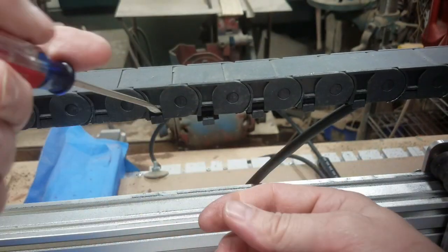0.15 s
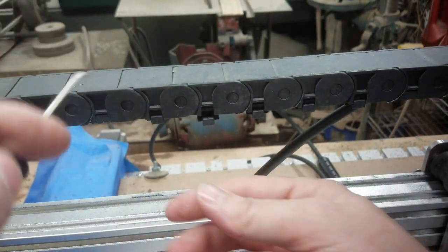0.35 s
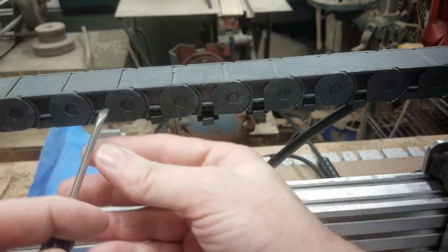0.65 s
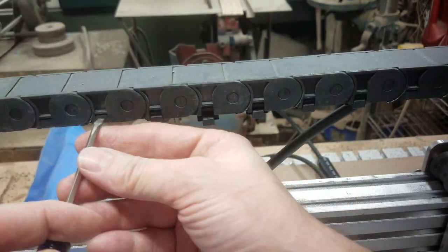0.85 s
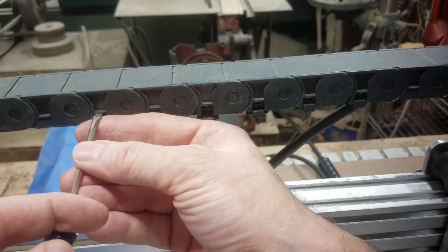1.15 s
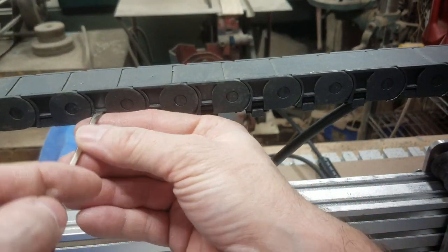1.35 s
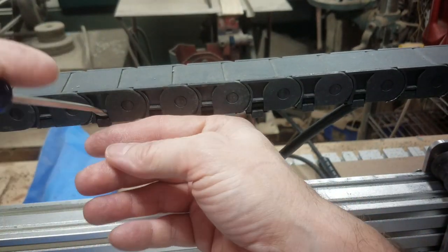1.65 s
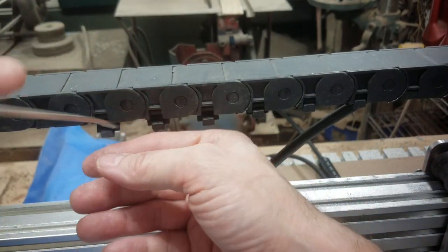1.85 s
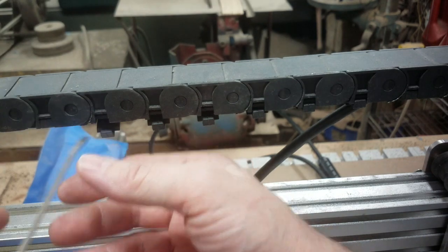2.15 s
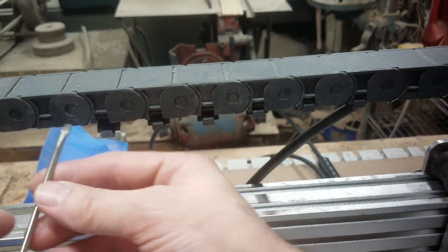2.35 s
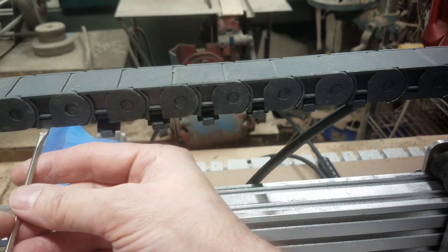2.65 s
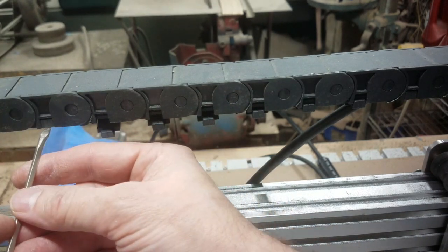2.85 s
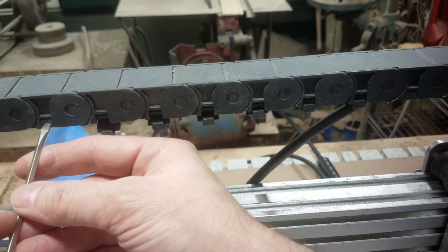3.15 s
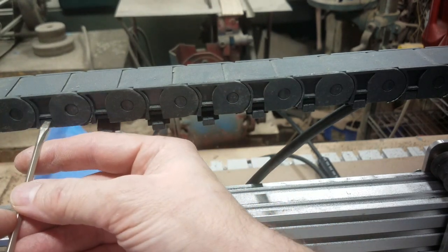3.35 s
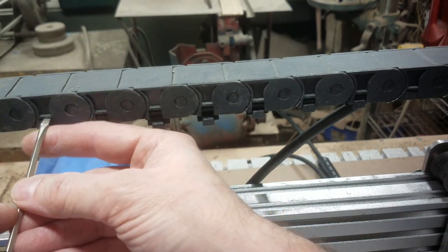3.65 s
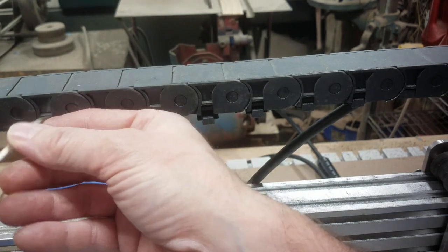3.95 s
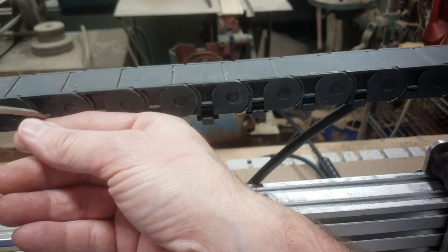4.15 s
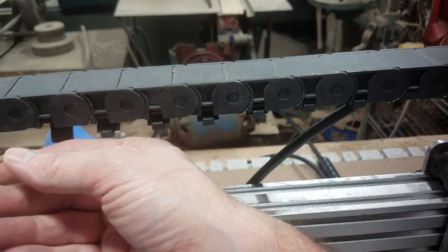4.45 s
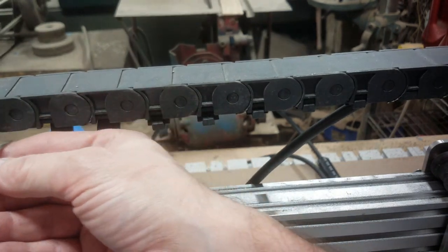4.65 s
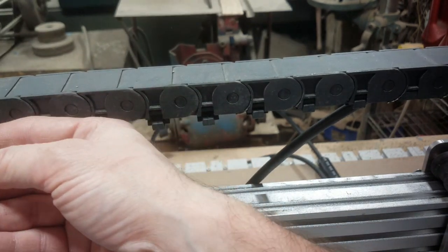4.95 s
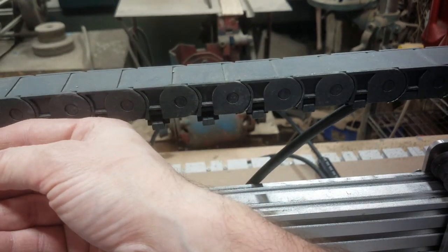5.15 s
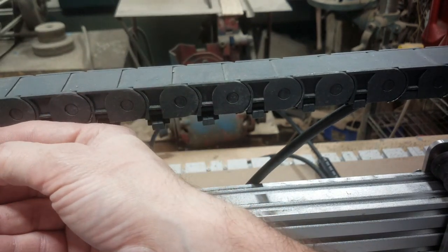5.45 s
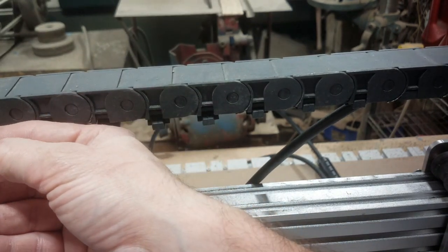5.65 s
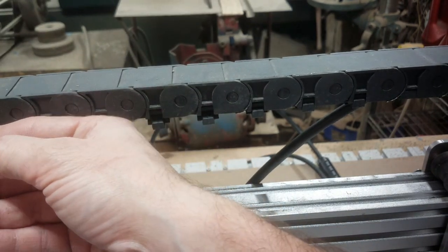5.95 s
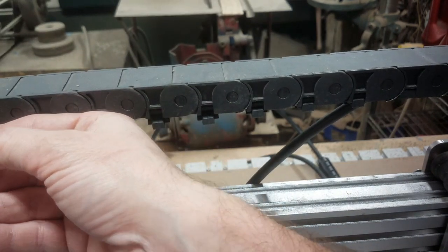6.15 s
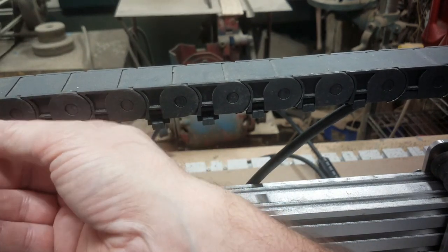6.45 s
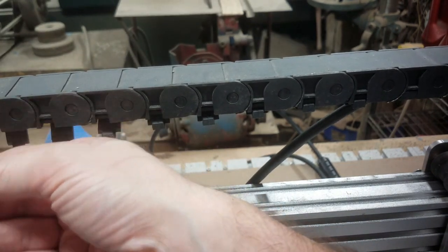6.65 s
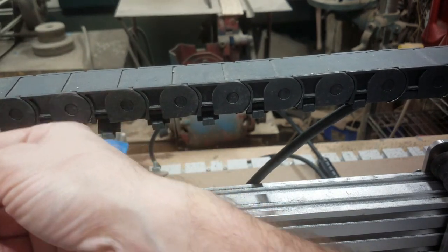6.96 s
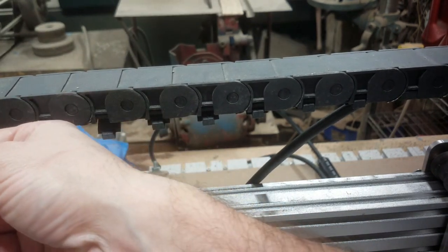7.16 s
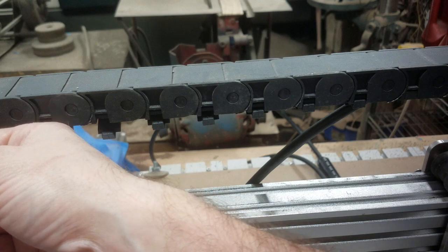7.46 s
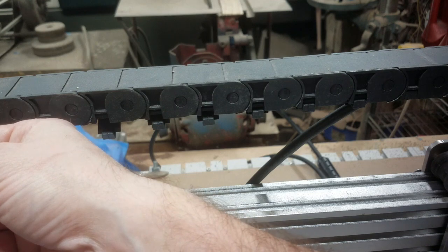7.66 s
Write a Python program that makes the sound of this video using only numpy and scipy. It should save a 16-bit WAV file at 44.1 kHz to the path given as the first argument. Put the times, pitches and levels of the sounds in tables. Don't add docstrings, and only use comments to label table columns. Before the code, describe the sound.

Sharp plastic snaps as a small blade pries chain crossbars open, with light taps, gritty slips and one brief squeak over faint workshop hum.

```python
import sys
import numpy as np
from scipy import signal
from scipy.fft import rfft, irfft
from scipy.io import wavfile
from scipy.ndimage import uniform_filter1d

SR = 44100
rng = np.random.default_rng(int(sys.argv[2]) if len(sys.argv) > 2 else 0)


def natural_amplitude(level_db):
    exponent = np.asarray(level_db, float) / 20
    return 10 ** exponent


def int16_out(signal):
    q = np.round(np.clip(np.atleast_2d(signal).T, -1, 1) * 32767)
    wavfile.write(sys.argv[1], SR, q.astype(np.int16))


N = 343530
PORT_LAG = 8


def evened(x):
    return x / np.sqrt(np.mean(x ** 2) + 1e-20)


def read(points, hz):
    f, value = np.transpose(points)
    return np.interp(np.log(hz + 1), np.log(f + 1), value)


def add(mix, s, sound):
    part = mix[..., round(s * SR):][..., :sound.shape[-1]]
    part += sound[..., :part.shape[-1]]


def shaped(x, db):
    return irfft(rfft(x) * natural_amplitude(db), x.shape[-1])


# [f/Hz, level/dB, t60/s]
LINK_MODES = [(586, -48, 0.065), (750, -1, 0.012), (910, 0, 0.013), (1368, -7, 0.026), (1830, 11, 0.0088),
              (2320, 3, 0.039), (2800, 10.5, 0.021), (3276, -3, 0.049), (4140, -5, 0.039), (4670, 2, 0.028),
              (5330, -15, 0.023)]
# [f/Hz, level/dB]
SPRAY_COLOUR = [(400, -24.), (700, -2.), (1000, 0.), (2500, 0.), (4600, -1.), (5800, -10.), (7000, -4.),
                (8500, -1.), (12000, -1.), (16500, -6.)]
# [low f/Hz, high f/Hz, t60/s]
SPRAY_RANGES = [(300, 1500, .055), (1500, 6300, .036), (6300, 17000, .018)]


def click(db, body_db, edge_db, ring_hz, length, tuning, chance):
    t, f = np.arange(3000) / SR, np.fft.rfftfreq(3000, 1 / SR)
    focus_db = np.clip(-db / 3.5, 3, 11)

    def bump(hz):
        return focus_db * np.exp(-(np.log(hz / ring_hz + 1e-9) / .17) ** 2)

    cracks = chance[:300] ** 3 * np.exp(-t[:300] / .001)
    cracks = cracks / np.linalg.norm(cracks)
    hz, mode_db, t60 = np.transpose(LINK_MODES)[..., None]
    count = len(LINK_MODES)
    hz = hz * (1 + .06 * tuning[:count, None])
    mode_db = mode_db + 3 * tuning[20:20 + count, None]
    decay_db = -60 * t / np.minimum(length * t60, .035)
    modes = natural_amplitude(mode_db + bump(hz) + decay_db) * np.sin(2 * np.pi * hz * t)
    white = chance[400:] * natural_amplitude(2.5 * evened(uniform_filter1d(chance[:3000], 12)))
    rise = np.minimum(t / .0003, 1) * (1 + .8 * np.exp(-t / .0012))
    sound = 0
    for (lo, hi, fall), level_db in zip(SPRAY_RANGES, (db + body_db, db, db + edge_db)):
        outside = (f < lo) | (f >= hi)
        spray = shaped(white, read(SPRAY_COLOUR, f) + bump(f) - 80 * outside)
        spray = spray * natural_amplitude(-60 * t / (length * fall)) * rise
        inside = (hz >= lo) & (hz < hi)
        ring = signal.fftconvolve((modes * inside).sum(0), cracks)[:3000]
        part = spray + natural_amplitude(-17) * ring
        loudest = np.sqrt(uniform_filter1d(part ** 2, 170).max())
        sound = sound + natural_amplitude(level_db - 2.5) * part / loudest
    return sound


# [t/s, peak level/dB, body level/dB, edge level/dB, ring length factor]
BAR_SNAPS = [
    (1.4625, -7, -9.5, -4.5, 0.57),
    (1.5803, -18.5, -7.5, -1.5, .45),
    (4.0031, -8, -11, -7, .9),
    (6.2173, -5.5, -16.5, -2.5, 0.91),
]
# [f/Hz, level/dB, t60/s]
BAR_MODES = [
    [(1410, -1, .04), (453, -3.5, .09), (2380, -4, .05), (4400, -7, .06), (8800, 5.5, 0.036)],
    [(2780, -1, .06), (950, 0, 0.044), (4580, -8, .05)],
    [(1770, -3, .05), (690, -1.5, .07), (2390, -1, 0.065), (4000, -4, .04), (8400, -2, 0.032)],
    [(1934, -5, .08), (740, -9, 0.065), (2380, -8, .05), (3280, -7, .06), (4400, -9, .06)],
]


def snaps():
    return [(*row[:4], modes[0][0], row[4]) for row, modes in zip(BAR_SNAPS, BAR_MODES)]


def loose_bar(db, modes, chance):
    t = np.arange(6000) / SR
    hz, mode_db, t60 = np.transpose(modes)[..., None]
    decay_db = -60 * t / np.clip(t60, .015, .06)
    ring = natural_amplitude(mode_db + decay_db) * np.sin(2 * np.pi * (hz * t + chance[:len(modes), None]))
    push_hz, push_s = 110, .016
    shove = sum(np.sin(2 * np.pi * (push_hz * (0.545 + u) * t + u)) for u in chance[:3])
    push = t / push_s * np.exp(1 - t / push_s) * shove
    return natural_amplitude(db - 14) * ring.sum(0) * np.minimum(t / 0.00057, 1) + natural_amplitude(db - 50) * push


# [t/s, peak level/dB, edge level/dB, ring f/Hz]
BLADE_TAPS = [(0.065, -36, -5, 3160), (0.1142, -31.5, -25, 2900), (0.1441, -29.5, 1, 2040),
              (0.474, -33.5, -15, 2450), (1.2443, -31.5, -26, 3260), (1.4413, -28, -6, 1460),
              (1.6747, -33, -28, 2650), (1.8061, -24, -27, 2410), (2.547, -42, -7, 1160),
              (3.855, -37, -22, 3200), (3.9819, -23.5, -8, 1780), (4.085, -32, -20, 1980),
              (4.1937, -37, -4, 2470), (4.211, -28, -19, 2140), (5.6341, -40.5, -2.5, 1210),
              (5.888, -33, -9, 1310), (6.2569, -25, -6, 1000), (6.3528, -34, 6.5, 3570),
              (7.0382, -45, -9, 2940)]


def taps():
    hits = []
    for s, db, edge_db, ring_hz in BLADE_TAPS:
        body_db = -6.5 - 11.5 * np.log2(ring_hz / 2000)
        hits.append((s, db, body_db, edge_db, ring_hz, 0.7))
    return hits


# [t/s, peak level/dB, ring f/Hz]
SHAFT_KNOCKS = [
    (1.3418, -51, 1250),
    (1.407, -49, 1070),
    (4.677, -50, 920),
    (5.6496, -49, 1000),
    (5.6776, -51, 1600),
    (3.86, -47.5, 795),
]


def knocks():
    body_db, edge_db, ring_length = 8.5, -6, 0.55
    return [(s, db, body_db, edge_db, hz, ring_length) for s, db, hz in SHAFT_KNOCKS]


# [t/s, peak level/dB, edge level/dB, ring f/Hz]
TIP_TICKS = [
    (3.0625, -48.5, 4, 4500),
    (3.185, -52.5, 0, 4500),
    (5.012, -44.5, -4, 4560),
    (5.549, -42, 6.5, 6000),
    (5.4835, -43, -25, 4400),
    (7.5107, -55, 2, 3000),
    (7.6303, -55, 2, 4000),
]


def ticks():
    body_db, ring_length = -14, .55
    return [(s, db, body_db, edge_db, hz, ring_length) for s, db, edge_db, hz in TIP_TICKS]


# [f/Hz, level/dB per Hz]
RUB_COLOUR = [(290, -35), (500, -17), (868, -5.5), (1050, -6.5), (1190, -9.5), (1600, -11.5), (1840, -15),
              (2730, -8), (2930, -12), (4870, -18), (6800, -32.5), (8960, -14), (16000, -29)]


def scrape(rows, chance):
    s, *columns = np.transpose(rows)
    t = np.arange(s[0], s[-1], 1 / SR)
    db, body_db, edge_db = (np.interp(t, s, c) for c in columns)
    slips = chance[0] * natural_amplitude(3.5 * evened(uniform_filter1d(chance[1], 40)))
    z = signal.stft(slips, nperseg=128)[2]
    patches = chance[2:].reshape(-1)[:z.size].reshape(z.shape)
    patches = evened(uniform_filter1d(uniform_filter1d(patches, 2, 0), 7, 1))
    grit = signal.istft(z * natural_amplitude(5.5 * patches), nperseg=128)[1]
    f = np.fft.rfftfreq(len(grit), 1 / SR)
    colour = np.maximum(read(RUB_COLOUR, f), -27)
    parts = []
    for lo, hi in ((550, 1500), (1500, 7000), (7000, 16500)):
        outside = (f < lo) | (f > hi)
        parts.append(evened(shaped(grit, colour - 80. * outside))[:len(t)])
    body, core, edge = parts
    sound = natural_amplitude(db + body_db) * body + natural_amplitude(db) * core + natural_amplitude(db + np.minimum(edge_db, 9)) * edge
    return sound * signal.windows.tukey(len(t), .08)


def stroke(s, press, ease, db, edge_db):
    light_body_db, hard_body_db = 2, -9
    return [(s - press, db - 17, light_body_db, edge_db),
            (s, db, hard_body_db, edge_db),
            (s + ease, db - 25, light_body_db, edge_db)]


# [t/s, length/s, pressure level/dB]
BLADE_SLIDES = [
    (0.477, .04, -49),
    (1.241, 0.033, -46.5),
    (1.582, 0.021, -28.5),
    (3.86, .04, -55),
    (4.09, 0.043, -45.5),
    (5.889, 0.027, -40),
    (6.227, 0.027, -22.5),
    (6.261, 0.081, -34.5),
]


def slides():
    return [stroke(s, 0, length, db, -10)[1:] for s, length, db in BLADE_SLIDES]


# [hardest at t/s, press/s, ease/s, pressure level/dB, edge level/dB]
RUB_STROKES = [(0.114, .01, 0.053, -41, -4), (.146, 0.028, 0.0071, -42, -1), (1.579, 0.015, 0.0049, -38, 9),
               (1.675, 0.0075, 0.037, -37.5, -10), (1.711, 0.038, .03, -41, 0),
               (1.748, 0.039, 0.043, -31.5, -6.5), (1.827, 0.031, 0.017, -32, -8),
               (3.062, 0.037, .03, -58.5, 3), (3.182, 0.024, .03, -61, 2),
               (4.033, 0.013, 0.065, -37.5, -10), (4.196, 0.0087, .05, -39, -0.5),
               (4.227, 0.021, 0.026, -35, -7.5), (4.324, 0.018, 0.022, -42, -2),
               (5.016, 0.025, .025, -52, 0), (5.633, .014, 0.052, -48, -10), (5.884, 0.044, 0.0065, -55, 3),
               (6.376, 0.037, 0.022, -35.5, 1), (6.386, 0.011, 0.029, -27.5, -7),
               (6.416, .02, 0.027, -27, -4.5), (6.43, .006, 0.017, -40.5, -1),
               (6.451, .016, 0.025, -37, -2.5)]


def rubs():
    return [stroke(*row) for row in RUB_STROKES]


# [t/s, pitch f/Hz, level/dB]
SQUEAK_PATH = [
    (6.374, 872, -36),
    (6.388, 845, -37),
    (6.397, 880, -54),
    (6.402, 879, -32),
    (6.418, 898, -35),
    (6.426, 905, -36.5),
    (6.446, 800, -52),
]
# [multiple, level/dB]
SQUEAK_HARMONICS = [(1, 0), (2, -1), (3, -3), (4, -17), (5, -7), (11, -29)]


def squeak():
    s, hz, db = np.vstack(SQUEAK_PATH).T
    t = np.arange(s[0], s[-1], 1 / SR)
    wobble = evened(uniform_filter1d(rng.standard_normal(4410), 60))[:len(t)]
    turns = np.cumsum(np.interp(t, s, hz) * (1 + .02 * wobble)) / SR
    slips = sum(natural_amplitude(g) * np.cos(2 * np.pi * round(k) * turns) for k, g in SQUEAK_HARMONICS)
    return s[0], np.sqrt(2) * natural_amplitude(np.interp(t, s, db)) * slips * signal.windows.tukey(len(t), .2)


# [t/s, peak level/dB, pitch f/Hz]
CHAIN_JOLTS = [(1.244, -49.5, 266), (1.439, -50, 201), (1.459, -33, 214.4), (1.574, -42.5, 283),
               (1.672, -44, 171.4), (1.739, -45.5, 192), (1.805, -47, 293), (4, -33, 214.3),
               (4.193, -45, 310.6), (4.212, -52, 264), (5.633, -48, 259), (5.678, -51, 296),
               (5.886, -43.5, 210), (6.216, -36.5, 260), (6.255, -41, 188), (6.383, -46, 199.6),
               (6.409, -52.5, 130)]


def jolts(near):
    t = np.arange(12000) / SR
    for (s, db, hz), chance in zip(CHAIN_JOLTS, rng.random((40, 5))):
        thud = 0
        for k, u in enumerate(chance):
            mode_hz = hz * (.8 + 0.3025 * k + 0.233 * u)
            thud = thud + natural_amplitude(-3. * k) * np.sin(2 * np.pi * (mode_hz * t + u))
        add(near, s, natural_amplitude(db - 60 * t / 0.18) * thud * (1 - np.exp(-t / 0.0038)))


def chain_face(tunings):
    face = np.zeros(N)
    hits = snaps() + ticks() + taps() + knocks()
    for row, tuning, chance in zip(hits, tunings, rng.standard_normal((60, 3400))):
        add(face, row[0], click(*row[1:], tuning, chance))
    for rows, chance in zip(slides() + rubs(), rng.standard_normal((40, 4, 6000))):
        add(face, rows[0][0], scrape(rows, chance))
    return signal.sosfilt(signal.butter(4, 330, "highpass", fs=SR, output="sos"), face)


# [f/Hz, t60/s]
HALL_DECAY = [(200, 0.48), (1000, 0.14), (4000, 0.17), (9000, 0.11), (15000, 0.083)]


def hall(x):
    taps = np.zeros((3, 2, SR // 3))
    at = np.arange(40, SR // 3 - 10, 10) + rng.integers(0, 10, (3, 2, (SR // 3 - 41) // 10))
    np.put_along_axis(taps, at, rng.choice([-1., 1.], at.shape), 2)
    hz, t, z = signal.stft(taps, SR, nperseg=128)
    tails = signal.istft(z * natural_amplitude(-60 * t / read(HALL_DECAY, hz)[:, None]), SR, nperseg=128)[1]
    tails = tails / np.linalg.norm(tails[0, 0])
    turn = np.arange(N) / SR * 2 * np.pi * 37
    share = np.sqrt(2 / 3) * np.cos(turn + np.arange(3)[:, None] * 2 * np.pi / 3)
    return signal.fftconvolve((share * x)[:, None], tails, axes=2).sum(0)[:, :N]


# [f/Hz, level/dB per Hz]
FLOOR_COLOUR = [(12, -25.5), (20, -23), (34, -16), (53, -20.5), (218, -17), (416, -19), (690, -16),
                (750, -18.5), (888, -12), (1140, -20.5), (1510, -17), (6530, -35.5), (12800, -29),
                (15200, -23.5), (16500, -50)]
# [f/Hz, width/Hz, level/dB]
HALL_DRONES = [(347.4, 58, -58.5), (415.4, 40, -52), (471.5, 56, -56.5), (578, 63, -58.5), (850, 33, -72.5),
               (1021, 19, -69.5), (1304, 54, -75), (1557, 28, -71), (4050, 390, -76.5), (12650, 550, -66)]
# [f/Hz, level/dB]
MACHINE_TONES = [(686, -63.5), (900, -64.5), (1373, -68.5), (1799, -87), (3601, -73), (4198, -77)]
# [f/Hz, likeness 0-1]
PORT_LIKENESS = [(40, 0.23), (300, 0.93), (700, 0.99), (1500, 0.061), (4000, 0.022), (15000, 0.027)]
# [f/Hz, level/dB]
PORT_LEAN = [(60, 2.5), (240, 2.5), (950, 3.5), (3770, 0.5), (15000, 4.5)]


def workshop():
    frames, hz = N // 1024 + 6, np.fft.rfftfreq(4096, 1 / SR)
    a, b, c, d, patches = rng.standard_normal((frames, 2049, 5)).T
    patches = evened(uniform_filter1d(uniform_filter1d(patches, 30, 0), 4, 1))
    power = natural_amplitude(read(FLOOR_COLOUR, hz)) ** 2
    power *= natural_amplitude(-54.5) ** 2 / power.sum()
    for f, width, db in HALL_DRONES:
        bell = (1 + (2 * (hz - f) / width) ** 2) ** -2.
        power += natural_amplitude(db) ** 2 * bell / bell.sum()
    same = np.clip(read(PORT_LIKENESS, hz), 0, 1)[:, None]
    left = a + 1j * b
    late = np.exp(-2j * np.pi * hz * PORT_LAG / SR)[:, None]
    right = same * late * left + np.sqrt(1 - same ** 2) * (c + 1j * d)
    lean_db = np.multiply.outer([.5, -.5], read(PORT_LEAN, hz))[..., None]
    z = np.array([left, right]) * natural_amplitude(lean_db + .6 * patches) * np.sqrt(power)[:, None]
    noise = signal.istft(z, nperseg=4096, noverlap=3072)[1][:, :N]
    out = np.sqrt(power.sum()) * evened(noise)
    t = np.arange(N + PORT_LAG) / SR
    for f, db in MACHINE_TONES:
        drift, swell = (np.interp(t, np.arange(80) / 10, v) for v in rng.standard_normal((80, 2)).T)
        turns = np.cumsum(f * (1 + 0.00124 * drift)) / SR
        tone = np.sqrt(2) * natural_amplitude(db + 0.5 * swell) * np.sin(2 * np.pi * turns)
        out += [0.98 * tone[PORT_LAG:], 0.89 * tone[:N]]
    return out


def scene():
    room, tunings = workshop(), rng.standard_normal((60, 40))
    near, other = chain_face(tunings), chain_face(tunings)
    add(near, *squeak())
    jolts(near)
    for row, modes, chance in zip(BAR_SNAPS, BAR_MODES, rng.random((4, 8))):
        add(near, row[0], loose_bar(row[1], modes, chance))
    f = np.fft.rfftfreq(N, 1 / SR)
    same = read([(600, .97), (1200, .8), (2500, .45), (6000, .3), (16000, .15)], f)
    far = rfft(np.roll(near, PORT_LAG)) * same + rfft(np.roll(other, PORT_LAG)) * np.sqrt(1 - same ** 2)
    shade_db = -2.5 * np.clip((f - 5800) / 1500, 0, 1)
    far = irfft(far * natural_amplitude(shade_db), N)
    pan_db = 2.5
    return room + [natural_amplitude(pan_db / 2) * near, natural_amplitude(-pan_db / 2) * far] + natural_amplitude(-11.5) * hall(near)


def band_limit(x):
    return signal.sosfilt(signal.butter(12, 17000, fs=SR, output="sos"), x)


def record(dry):
    edge = signal.firwin(255, 16250, window=("kaiser", 9), fs=SR)
    soft = 0.88 * np.tanh(dry / .9)
    mix = signal.oaconvolve(soft, edge[None], "same") - 0.0015
    return band_limit(mix)


dry = scene()
out = record(dry)
int16_out(out)
```